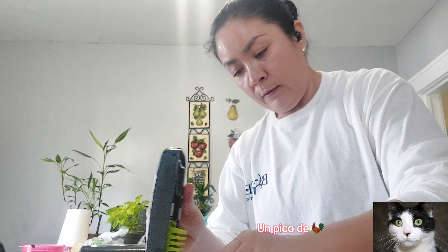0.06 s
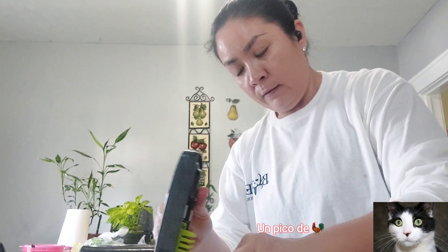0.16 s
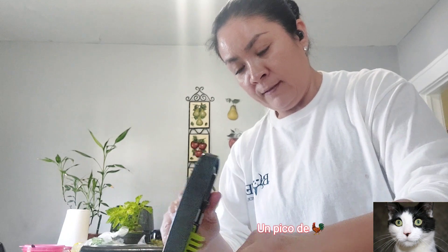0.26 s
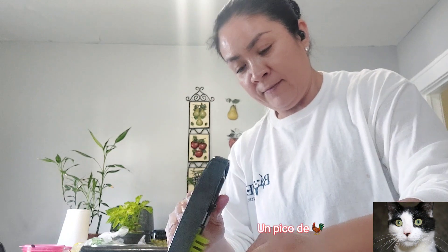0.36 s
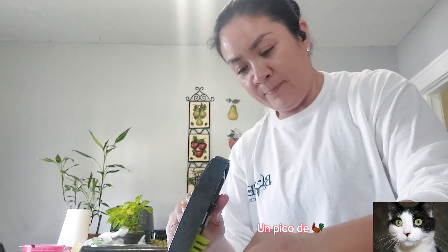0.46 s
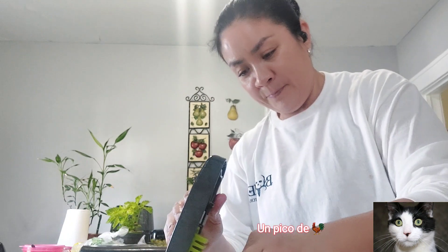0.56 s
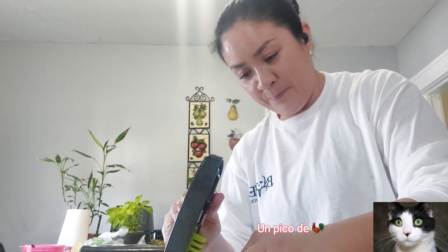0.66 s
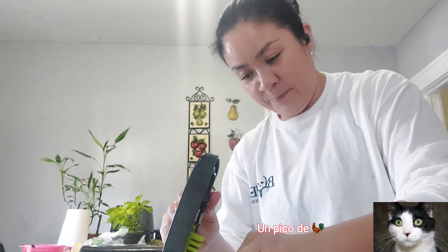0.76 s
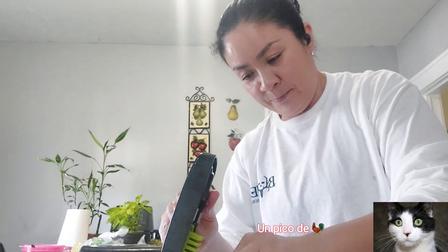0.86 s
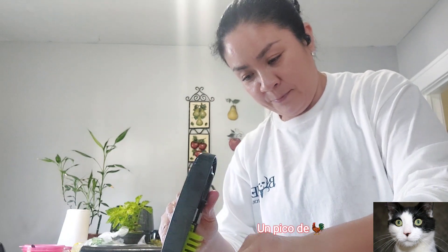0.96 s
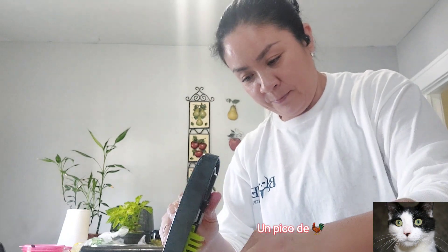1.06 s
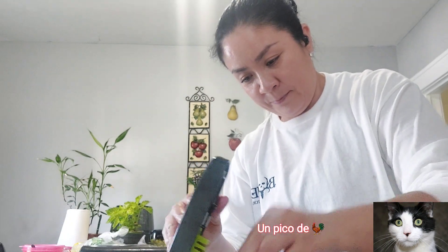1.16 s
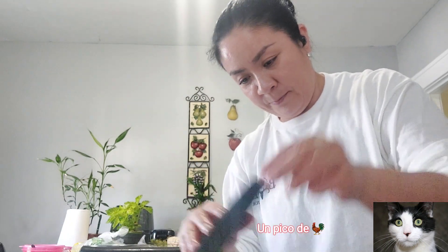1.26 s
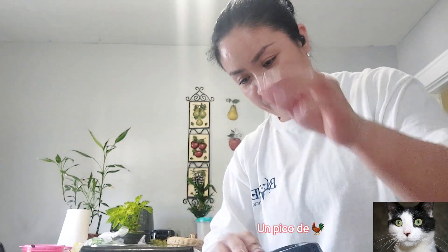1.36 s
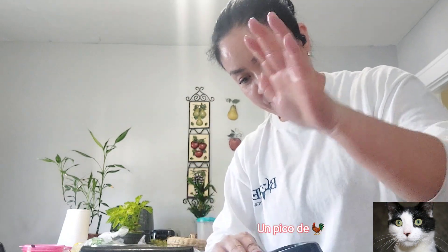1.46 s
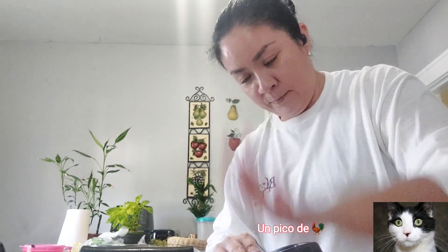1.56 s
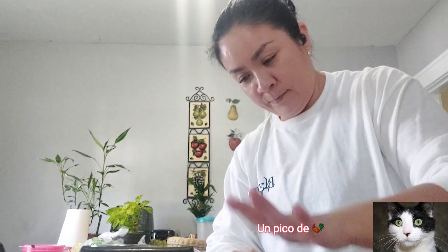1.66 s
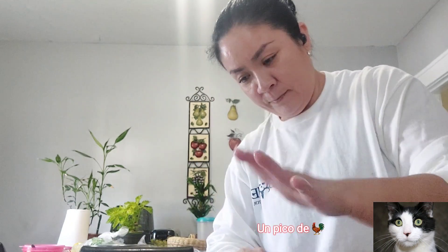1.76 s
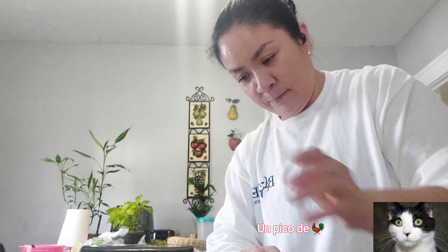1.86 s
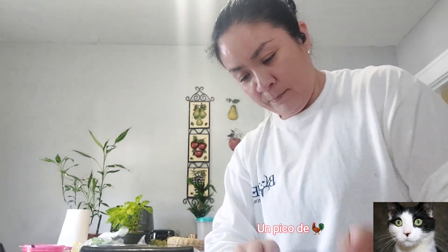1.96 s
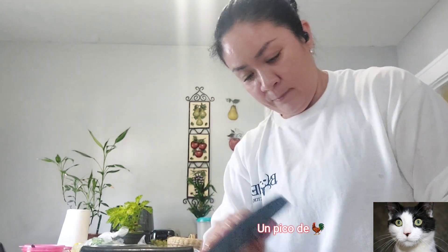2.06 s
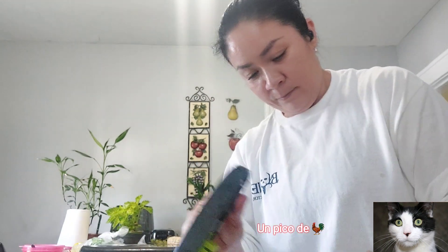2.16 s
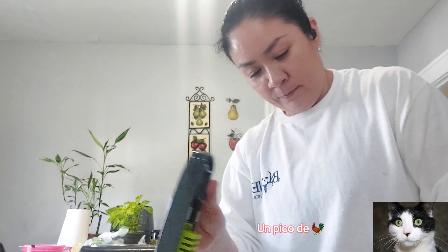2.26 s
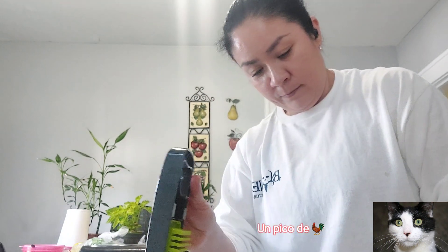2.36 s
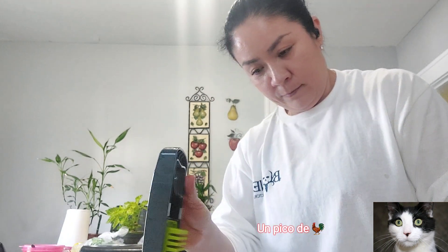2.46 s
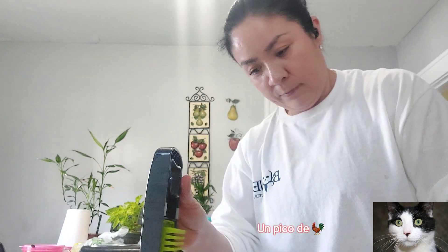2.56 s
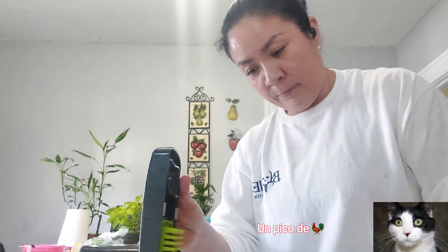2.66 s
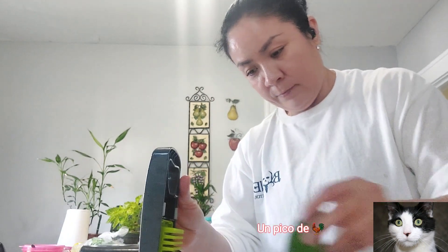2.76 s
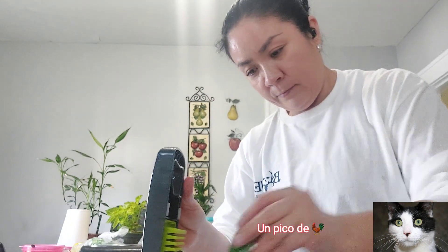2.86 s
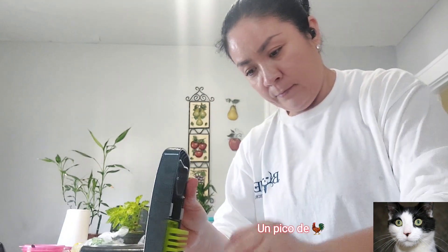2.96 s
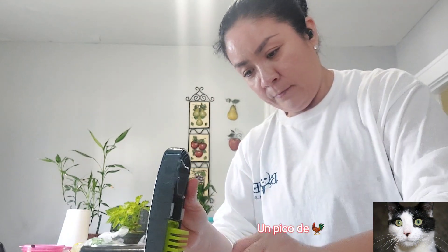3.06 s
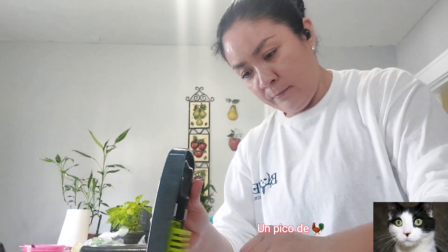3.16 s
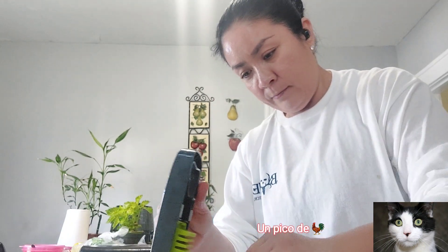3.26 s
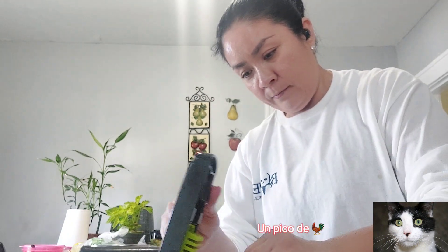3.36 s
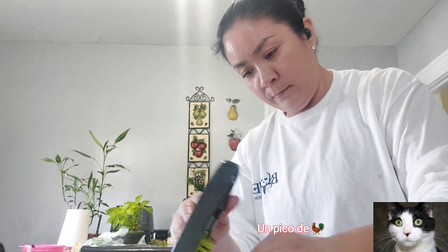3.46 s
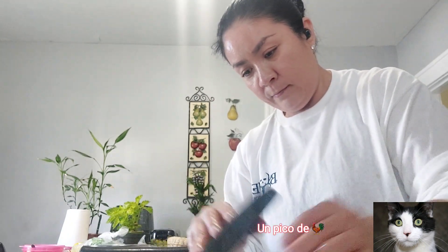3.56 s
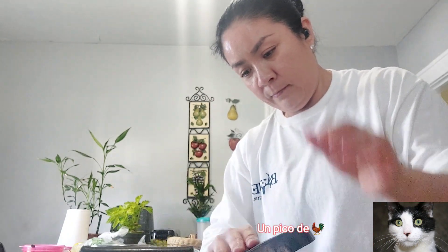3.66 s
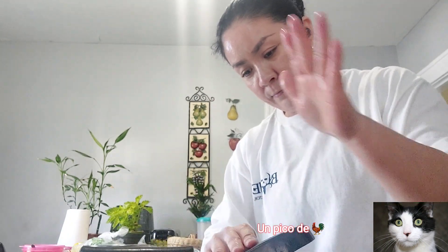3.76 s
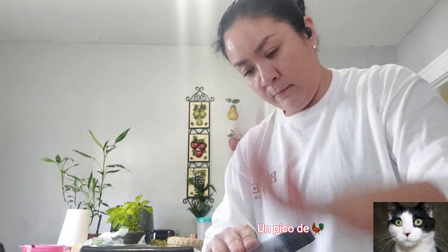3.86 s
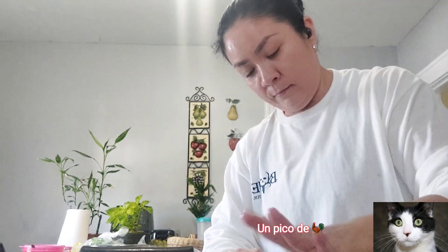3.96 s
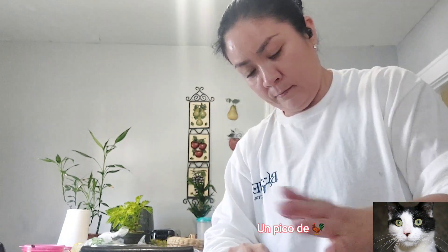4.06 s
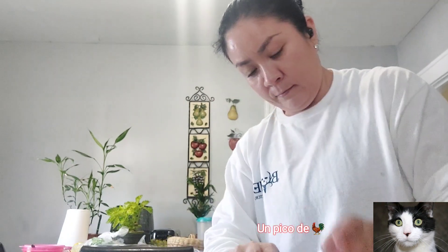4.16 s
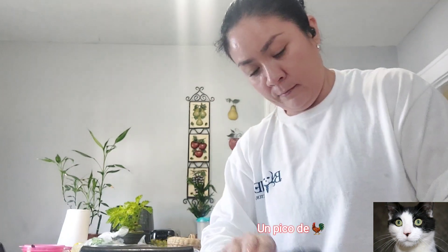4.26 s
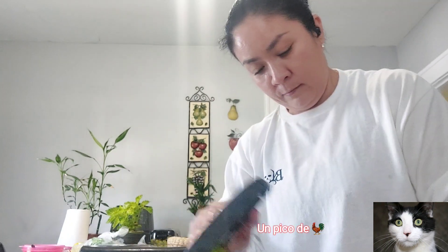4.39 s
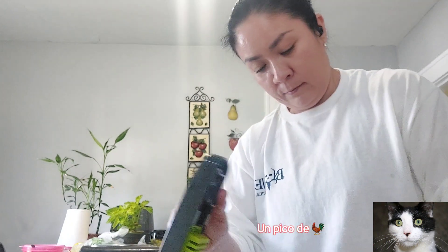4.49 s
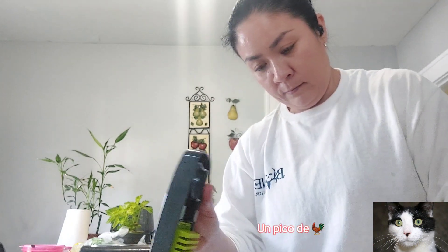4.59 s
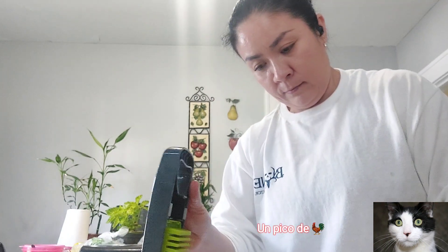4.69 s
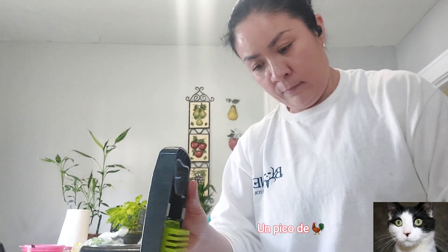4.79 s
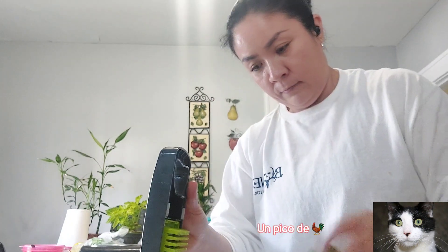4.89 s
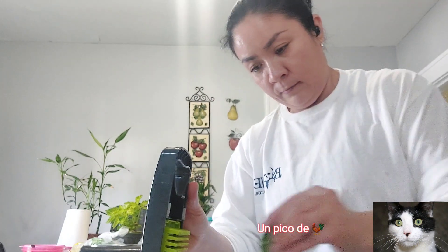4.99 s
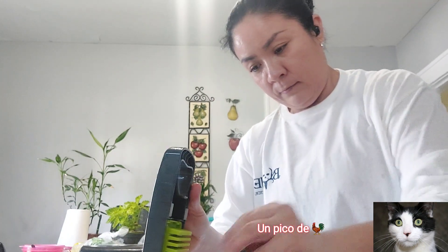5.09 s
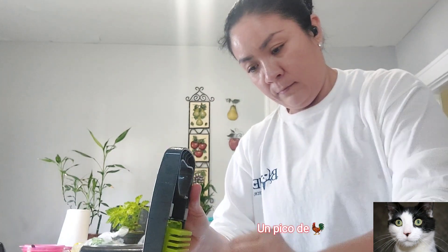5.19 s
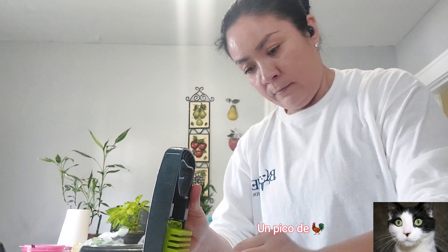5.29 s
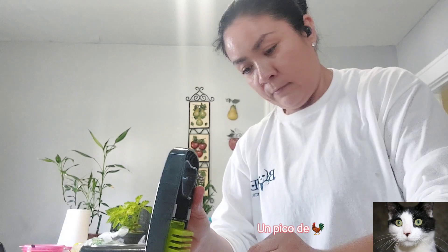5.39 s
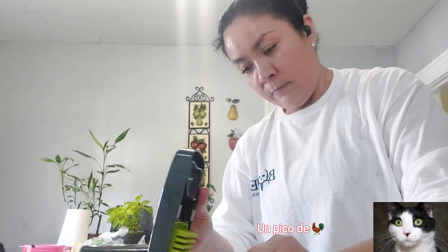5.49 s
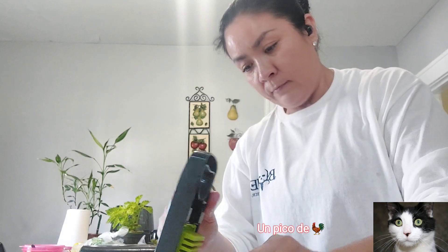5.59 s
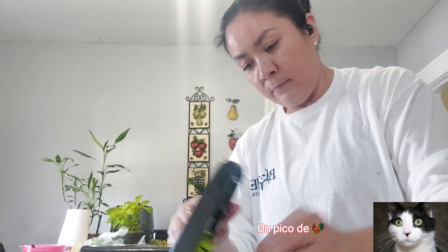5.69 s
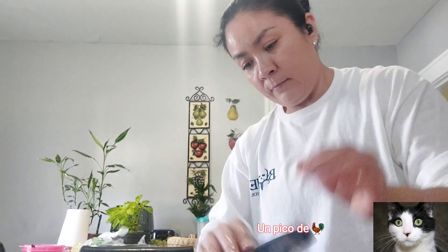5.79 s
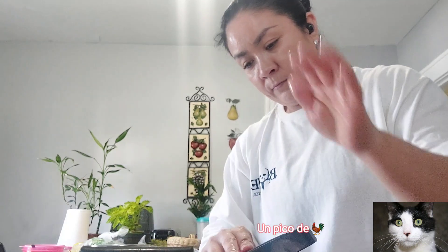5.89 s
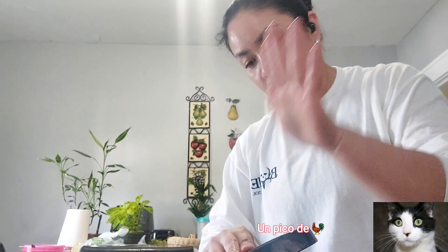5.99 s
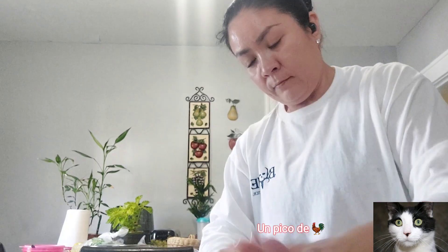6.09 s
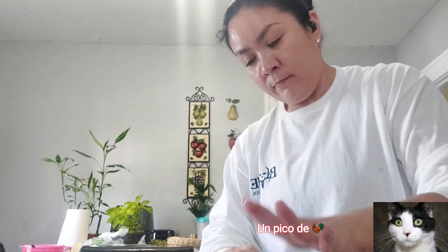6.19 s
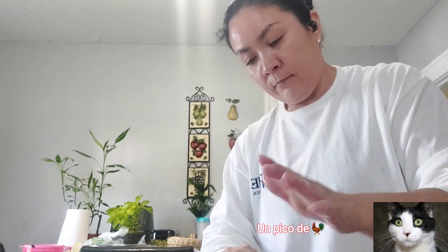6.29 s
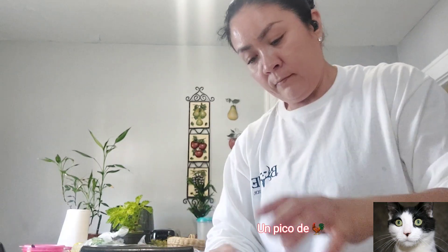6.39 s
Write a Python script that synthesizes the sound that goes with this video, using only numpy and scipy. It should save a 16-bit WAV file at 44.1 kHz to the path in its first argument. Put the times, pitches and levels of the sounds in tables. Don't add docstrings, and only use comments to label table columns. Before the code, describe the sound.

A near stereo microphone catches a hollow plastic vegetable chopper being worked on a counter: quiet finger rustles, light knocks as food is set down, a crisp blade crunch, then a violent clacking slap. Three such slaps come a little over two seconds apart, the first two followed by rattling lid lifts. Each slap leaves a brief lively room tail and a faint low bowl tone, over steady refrigerator hum leaning left.

```python
import sys
import numpy as np
from scipy import signal
from scipy.fft import rfft, irfft, next_fast_len
from scipy.io import wavfile

SR = 44100
rng = np.random.default_rng(int(sys.argv[2]) if len(sys.argv) > 2 else 0)


def to_linear_factor(level_db):
    exponent = np.asarray(level_db, float) / 20
    return 10 ** exponent


def transcribe(u):
    v = np.clip(np.atleast_2d(u).T, -1, 1)
    q = np.round(v * 32767).astype(np.int16)
    wavfile.write(sys.argv[1], SR, q)


N = 284004


def rms_one(x):
    return x / np.sqrt(np.mean(x ** 2) + 1e-20)


def at_hz(points, hz):
    curve_hz, values = np.transpose(points)
    return np.interp(np.log(hz), np.log(np.maximum(curve_hz, 1)), values)


def ring(clicks, hz, t60):
    keep, turn = to_linear_factor(-60 / (t60 * SR)), 2 * np.pi * hz / SR
    return signal.lfilter([0, np.sin(turn)], [1, -2 * keep * np.cos(turn), keep * keep], clicks + 1e-18)


def colour(x, gain):
    size = next_fast_len(x.shape[-1])
    hz = np.maximum(np.arange(size // 2 + 1) * SR / size, 10)
    return irfft(rfft(x, size) * gain(hz), size)[..., :x.shape[-1]]


def lean(x, points):
    return colour(x, lambda hz: to_linear_factor(np.outer([.5, -.5], at_hz(points, hz))))


# (frequency [Hz], likeness [0 to 1])
LIKENESS = [(60, 0.23), (300, 0.71), (700, 0.77), (1400, 0), (15000, 0)]


def noise_pair():
    mid, side = rng.standard_normal((2, N))
    alike = lambda hz: np.clip(at_hz(LIKENESS, hz), 0, .99)
    mid = colour(mid, lambda hz: np.sqrt((1 + alike(hz)) / 2))
    side = colour(side, lambda hz: np.sqrt((1 - alike(hz)) / 2))
    return np.array([mid + side, mid - side])


# (frequency [Hz], level [dB])
HUM = [(59.2, 1.5), (113, -1), (118.4, -5), (124, 0), (237, -10), (243, -22), (285, -8.5), (345, -12)]


def refrigerator():
    t, hum = np.arange(N) / SR, 0
    for hz, db in HUM:
        waver = np.interp(t, np.arange(80) / 12, rng.standard_normal(80))
        hum = hum + to_linear_factor(db + 0.83 * waver) * np.sin(2 * np.pi * (hz * t + rng.random()))
    return rms_one(hum)


# (time [s], gain [dB])
GAIN = [(0, 0), (.6, 1), (1.3, 2), (1.9, 2), (2.4, -4.5), (2.65, -6.5), (3.0, -4), (3.2, -0.5), (3.6, 1.5),
        (4.4, -3.5), (4.9, -4), (5.15, -7), (5.4, 1), (5.75, 2.5), (6.44, 2)]
# (frequency [Hz], level per Hz [dB])
AIR = [(25, -24.5), (50, -14), (120, -6), (190, -16.5), (300, -13), (500, -20.5), (800, -25.5),
       (1300, -38.5), (2500, -42.5), (5000, -54.5), (7000, -49.5), (9000, -49), (11000, -53), (16000, -55)]
# (frequency [Hz], left minus right [dB])
AIR_LEAN = [(60, 6.5), (110, 14.5), (200, 10), (380, 11.5), (700, 9), (1290, 2.5), (2380, 3.5), (4400, 0.5),
            (8120, 1.5), (15000, -0.5)]


def background():
    t = np.arange(N) / SR
    gain_db = np.interp(t, *np.transpose(GAIN))
    duck_db = sum(12.5 * (t > s) * np.exp(-np.abs(t - s) / 0.65) for s, *_ in SLAPS)
    hum_db = -60 + 0.7 * gain_db
    air_db = -64.5 + 1.9 * gain_db
    hiss_db = -85.5 + 0.6 * gain_db - duck_db
    noise = colour(noise_pair(), lambda hz: to_linear_factor(at_hz(AIR, hz)))
    air = colour(noise, lambda hz: 1 / (1 + (hz / 2200) ** 4))
    hiss = noise - air
    lumps_db = 2 * np.interp(t, np.arange(200) / 25, rng.standard_normal(200))
    low_part = to_linear_factor(hum_db) * refrigerator() + to_linear_factor(air_db + lumps_db) * rms_one(air)
    return lean(low_part + to_linear_factor(hiss_db) * rms_one(hiss), AIR_LEAN)


# (time [s], swell [s], hold [s], level [dB])
BOWL = [
    (1.749, 0.032, 0.056, -44.5),
    (2.24, .03, 0.13, -61.5),
    (4.042, 0.23, 0.022, -43),
    (4.42, 0.096, 0.084, -59),
    (6.238, 0.1, .2, -43.5),
]


def bowl():
    level, t = np.zeros(N), np.arange(N) / SR
    for s, swell, hold, db in BOWL:
        rise = np.clip((t - s) / swell, 0, 1)
        release = np.exp(-np.maximum(t - s - swell - hold, 0) / 0.061)
        level += to_linear_factor(db) * rise * release
    tone = np.sqrt(2) * level * np.sin(2 * np.pi * 246 * t)
    return tone * to_linear_factor([[1.5], [-1.5]])


# (frequency [Hz], level [dB], t60 [s])
BOX = [(306, -10, 0.022), (365, -15, 0.12), (455, -8, 0.016), (485, -1.5, .05), (630, 1.5, 0.042),
       (720, -9.5, 0.15), (965, -5.5, 0.045), (1025, -11.5, 0.12), (1110, -19, 0.022)]


def contacts(rows, treble, rise_s, chatter_s, clicks_per_s, blow, own_t60, soft_hz):
    size = 8192
    out = np.zeros((5, N + size))
    t = np.arange(size) / SR
    lead = round(rise_s * SR)
    dying = np.exp(-np.abs(t - rise_s) / np.where(t < rise_s, rise_s / 3, chatter_s))
    soften = signal.butter(2, [230, soft_hz], "band", fs=SR)
    for s, box_db, hz, thump_db, clack_db, crack_db in rows:
        chance, sizes, fizz = rng.random(size), rng.standard_normal(size), rng.standard_normal(size)
        clicks = (chance < clicks_per_s / SR) * sizes * dying
        clicks[lead] = blow
        soft = signal.lfilter(*soften, clicks)
        wall = 1.6 * ring(soft, hz, own_t60)
        wall += 0.26 * ring(soft, hz, min(own_t60 * 5, 0.14))
        strengths = to_linear_factor(rng.normal(0, 3, len(BOX)))
        box = sum(k * to_linear_factor(db) * ring(soft, f, t60) for k, (f, db, t60) in zip(strengths, BOX))
        spit = np.abs(signal.lfilter([1], [1, -.97], clicks))
        rattle = fizz * (0.74 * dying + 1.594 * spit)
        at = max(round(s * SR) - lead, 0)
        out[:2, at:at + size] += to_linear_factor(box_db) * np.array([wall, box]) / np.abs(wall + box).max()
        out[2, at + lead] += to_linear_factor(box_db + thump_db)
        out[3, at:at + size] += to_linear_factor(box_db + clack_db) * rattle
        out[4, at:at + size] += to_linear_factor(box_db + crack_db) * rattle
    out[4] = colour(out[4], lambda f: to_linear_factor(at_hz(treble, f)))
    return out[:, :N]


def touches(rows, tilt_db, weight_db=None):
    shared = []
    for s, box_db, hz, *rest in rows:
        weight = rest[0] if weight_db is None else weight_db(box_db)
        bright_db = rest[-1]
        shared.append((s, box_db, hz, weight, bright_db + tilt_db / 2, bright_db - tilt_db / 2))
    return shared


# (time [s], box level [dB], box pitch [Hz], brightness [dB])
FUMBLES = [(0.052, -50.5, 532, -30), (0.131, -58, 347, -23), (0.162, -39.5, 483, -40),
           (0.322, -47, 507, -48), (0.473, -50.5, 326, -48), (0.503, -41, 480, -38), (0.544, -46, 517, -31),
           (0.593, -51.5, 355, -36), (0.872, -41, 532, -26), (0.889, -43.5, 448, -47),
           (0.924, -50, 450, -27), (1.034, -57, 350, -42), (1.139, -58, 470, -19), (3.053, -42.5, 321, -33),
           (3.184, -58, 630, -38), (3.242, -44.5, 510, -37), (3.559, -56.5, 346, -31),
           (4.368, -62, 457, -40), (5.558, -38.5, 470, -32.5), (5.674, -71, 345, -36),
           (5.749, -43.5, 310, -47), (5.777, -52.5, 517, -31), (6.036, -66, 310, -37)]
# (frequency [Hz], level per Hz [dB])
RUSTLE = [(3000, -28), (6000, -9.5), (10000, -8), (12000, 0), (15000, 1), (17000, -14)]


def fumbles():
    rows = touches(FUMBLES, -7, lambda box_db: -56.5 - box_db)
    return contacts(rows, RUSTLE, rise_s=0.0095, chatter_s=0.02, clicks_per_s=1900, blow=0.49,
                    own_t60=0.088, soft_hz=1140)


# (frequency [Hz], level per Hz [dB])
CRACK = [(4000, -27), (5500, -3), (7500, -6.5), (9500, -10), (12000, -5.5), (15000, -8), (17000, -7)]
# (time [s], box level [dB], box pitch [Hz], brightness [dB])
TICKS = [
    (2.5397, -50, 1137, -47),
]


def ticks():
    return contacts(touches(TICKS, 12.5, lambda box_db: -22), CRACK, rise_s=0.00277, chatter_s=0.01195,
                    clicks_per_s=600, blow=2.17, own_t60=0.063, soft_hz=1500)


# (time [s], box level [dB], box pitch [Hz], brightness [dB])
SHORT_KNOCKS = [
    (2.033, -19, 657, -46),
    (2.245, -48, 375, -47),
    (4.255, -33, 940, -35),
    (4.362, -43, 700, -47),
    (4.724, -47.5, 1386, -38),
    (4.74, -40.5, 521, -34),
    (5.238, -41, 682, -41),
    (5.56, -34.5, 522, -37.5),
    (5.75, -53, 448, -18),
]


def short_knocks():
    return contacts(touches(SHORT_KNOCKS, 12.5, lambda box_db: -23), CRACK, rise_s=0.0046, chatter_s=0.0066,
                    clicks_per_s=900, blow=1.0, own_t60=0.035, soft_hz=1000)


# (time [s], box level [dB], box pitch [Hz], weight on the counter [dB], brightness [dB])
LIFTS = [(1.904, -34.5, 780, -5, -26), (1.932, -23.5, 293, -21.5, -50), (1.98, -21, 423, -22, -36),
         (2.007, -10.5, 501, -27.5, -31), (2.019, -17, 423, -19, -45), (2.053, -24.5, 309.3, -18, -50),
         (2.102, -20.5, 355.7, -23.5, -31.5), (2.144, -29.5, 347.4, -19.5, -49.5),
         (2.223, -20.5, 520, -33.5, -45), (2.459, -40.5, 381.3, -17, -46), (2.477, -34, 296, -3, -40.5),
         (4.246, -36, 487, -8, -20), (4.284, -23.5, 402, -20, -26), (4.29, -11.5, 557, -22, -34.5),
         (4.548, -39, 497, -5.5, -44), (4.591, -41.5, 574, -21, -36), (4.717, -36, 483, -8, -31.5)]
# (time [s], box level [dB], box pitch [Hz], weight on the counter [dB], brightness [dB])
SETTINGS = [(3.044, -29.5, 685, -35, -41.5), (3.21, -24.5, 541, -19, -49), (3.325, -32.5, 493, -12, -32),
            (3.336, -33.5, 455, -15, -41.5), (3.449, -42.5, 358, -6, -41), (5.225, -40.5, 455, -9, -35),
            (5.338, -46, 479, -14, -29), (5.511, -29, 530, -24, -46), (5.844, -22, 332, -8, -20.5),
            (5.857, -12.5, 483, -52, -46), (5.939, -28.5, 474, -34, -60.5)]


def knocks():
    rows = touches(LIFTS, 12.5) + touches(SETTINGS, -1)
    return contacts(rows, CRACK, rise_s=0.0027, chatter_s=0.006, clicks_per_s=280, blow=1.2,
                    own_t60=0.061, soft_hz=1130)


# (time [s], box level [dB], box pitch [Hz], brightness [dB])
CRUNCHES = [(1.359, -21, 735, -25), (1.371, -23, 786, -21), (1.381, -16, 380, -21.5),
            (1.398, -12, 598, -30), (1.411, -31.5, 301, -34.5), (3.661, -29, 640, -22),
            (3.672, -13.5, 674, -30), (3.684, -24, 455, -32), (3.708, -27, 301, -40.5),
            (5.811, -23, 750, -22), (5.823, -17.5, 526, -32.5)]


def crunches():
    return contacts(touches(CRUNCHES, 3, lambda box_db: -21), CRACK, rise_s=0.0027, chatter_s=0.016,
                    clicks_per_s=1500, blow=0.93, own_t60=0.017, soft_hz=1100)


# (time [s], strength [dB], lid flexes after [s], lid seats after [s], brightness [dB])
SLAPS = [
    (1.633, 0, .004, .016, 3),
    (3.931, -0.5, .009, .022, 4),
    (6.086, -1, .006, .024, 2),
]


def slaps():
    palm_lands = (-1.05, 524, -22, -27, -28.5)
    lid_flexes = (0.8, 610, -14, -25, -33)
    lid_seats = (-0.3, 545.5, -12, -20.5, -22)
    rows = []
    for s, db, flex, seat, bright_db in SLAPS:
        for after, blow in zip((0, flex, seat), (palm_lands, lid_flexes, lid_seats)):
            box_db, hz, thump_db, clack_db, crack_db = blow
            rows.append((s + after, db + box_db, hz, thump_db, clack_db + bright_db, crack_db + bright_db))
    return contacts(rows, CRACK, rise_s=0.003, chatter_s=0.0088, clicks_per_s=1200, blow=0.71,
                    own_t60=0.016, soft_hz=1200)


# (frequency [Hz], level [dB], t60 [s])
COUNTER = [(63.3, -15, 0.71), (111.1, -2.5, 0.44), (157.2, -2.5, 0.28), (212, -2, 0.61), (330, -12, .4)]


def counter_top(thump):
    push = np.convolve(thump, np.hanning(330) / 150)[:N]
    push = push + 0.59 * np.roll(push, round(.019 * SR))
    return sum(to_linear_factor(db) * ring(push, hz, t60) for hz, db, t60 in COUNTER)


# (frequency [Hz], width [Hz], level [dB])
CLACK = [(1566, 70, -3), (1993, 110, 4.5), (2490, 440, -2.5), (3277, 380, 0), (4270, 1800, -9.5)]


def hard_plastic(rattle):
    out = 0
    for k, (hz, width, db) in enumerate(CLACK):
        out = out + (-1) ** k * to_linear_factor(db) * ring(rattle, hz, 2 / width) * np.sqrt(width / 300)
    return out


def chopper():
    lid = knocks()
    click = signal.lfilter(*signal.butter(1, (700, 3800), "band", fs=SR), lid[3]) + lid[4]
    wall, box, thump, clack, crack = fumbles() + ticks() + short_knocks() + lid + crunches() + slaps()
    near = to_linear_factor(-1.5) * wall + to_linear_factor(-5.5) * counter_top(thump)
    spread = to_linear_factor(-2.5) * box + to_linear_factor(-22) * hard_plastic(clack) + to_linear_factor(-2.5) * crack + to_linear_factor(-17.5) * near
    return near + to_linear_factor(-12) * click, spread


# (frequency [Hz], t60 [s])
ROOM_T60 = [(80, 1), (300, 0.32), (1000, 0.38), (3000, 0.41), (8000, 0.41), (14000, .33)]
# (frequency [Hz], level [dB])
ROOM_TONE = [(80, -21), (200, -17), (300, -14), (550, -23), (1100, -17.5), (1450, -21), (2000, -10),
             (2700, -14.5), (3400, -13), (5000, -13), (9000, -15.5), (14000, -17.5)]
# (frequency [Hz], left minus right [dB])
LEAN = [(60, 1), (110, 5), (200, 5.5), (380, 2), (700, 3.5), (1290, 3), (2380, 5.5), (4400, 10.5),
        (8120, 3), (15000, -1)]


def kitchen(x):
    size = 600
    t = np.arange(size) / SR
    spike = np.eye(size)
    scatter = rng.standard_normal((2, size)) * np.exp(-t / 0.0022) + 1.2 * spike[[0, 7]]
    treble = signal.lfilter(*signal.butter(2, 1300, "high", fs=SR), scatter)
    bass = signal.lfilter(*signal.butter(1, 1300, fs=SR), spike[[4, 0]])
    direct = to_linear_factor(-13.5) * treble + 0.81 * bass
    out = signal.fftconvolve(x[None], direct, axes=1)[:, :N]
    noise = [noise_pair(), noise_pair()]
    edges = np.geomspace(60, 17000, 25)
    for k, (low, high) in enumerate(zip(edges, edges[1:])):
        band = signal.butter(2, [low, high], "band", fs=SR, output="sos")
        hz = np.sqrt(low * high)
        keep = to_linear_factor(-120 / (np.clip(at_hz(ROOM_T60, hz), .1, .8) * SR))
        stored = signal.lfilter([.0015], [1, -keep], signal.sosfilt(band, x) ** 2)
        stored = signal.lfilter([.004], [1, -.996], stored)
        whole = np.sqrt(SR / 2 / (high - low))
        level = to_linear_factor(at_hz(ROOM_TONE, hz) + 12) * whole * np.sqrt(np.abs(stored))
        out += level * signal.sosfilt(band, noise[k % 2])
    return lean(out, LEAN)


def scene():
    near, spread = chopper()
    return background() + bowl() + lean(np.array([near, near]), LEAN) + kitchen(spread)


def band_limit(x):
    return signal.sosfilt(signal.butter(12, 16820, fs=SR, output="sos"), x)


def record(dry):
    ports = signal.sosfilt(signal.butter(3, 62, "high", fs=SR, output="sos"), dry)
    rounded = np.tanh(ports / 1.004) * 1.152
    top_cut = signal.ellip(10, .5, 70, 16250, fs=SR, output="sos")
    mix = signal.sosfilt(top_cut, rounded)
    return band_limit(mix)


dry = scene()
out = record(dry)
transcribe(out)
```